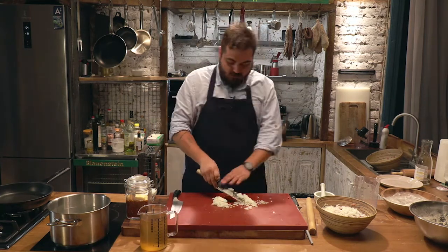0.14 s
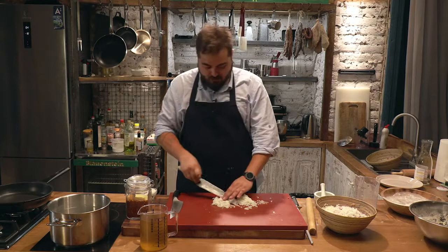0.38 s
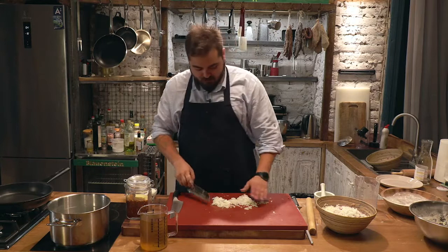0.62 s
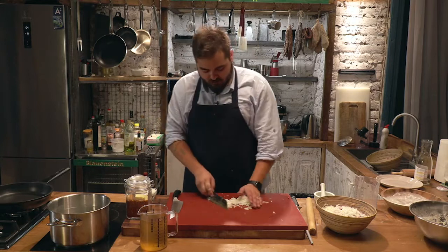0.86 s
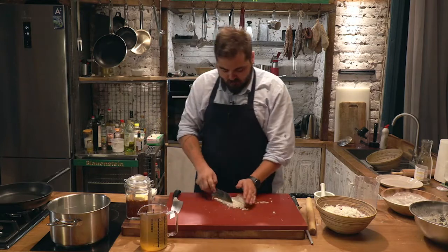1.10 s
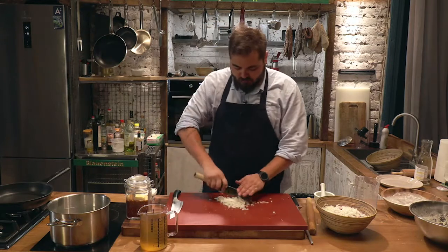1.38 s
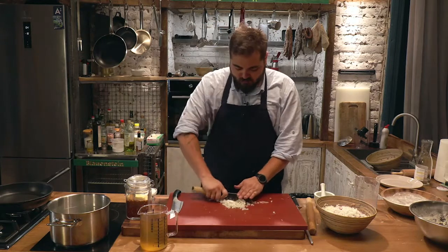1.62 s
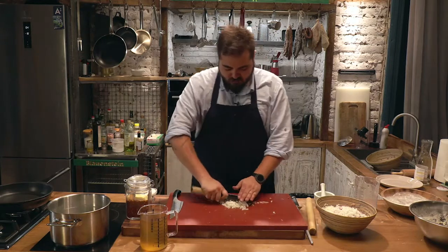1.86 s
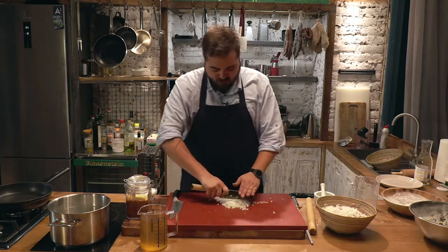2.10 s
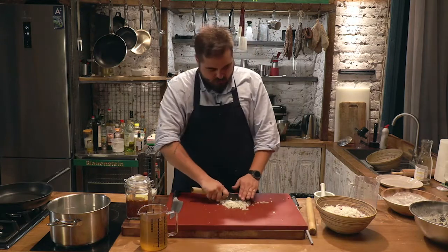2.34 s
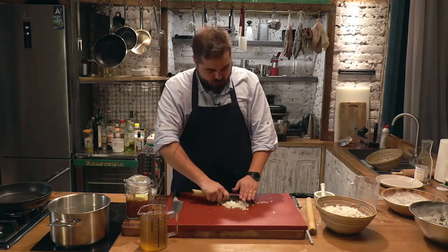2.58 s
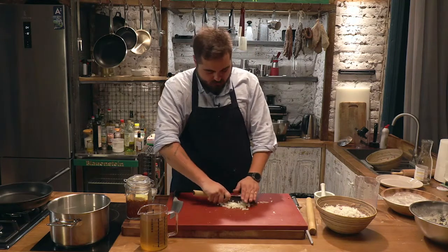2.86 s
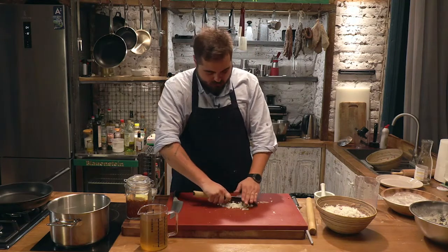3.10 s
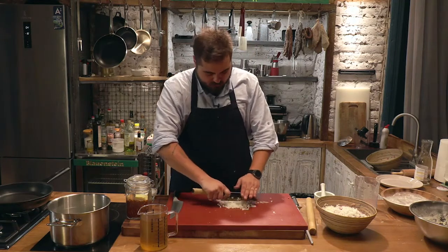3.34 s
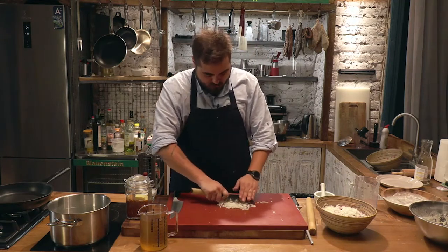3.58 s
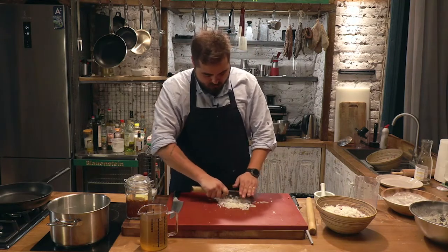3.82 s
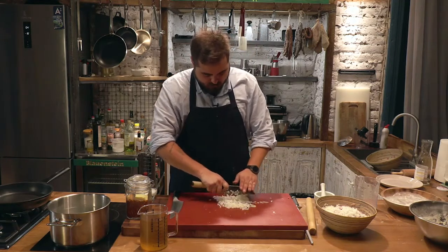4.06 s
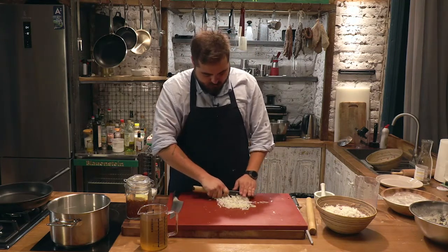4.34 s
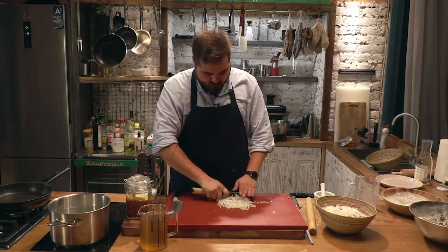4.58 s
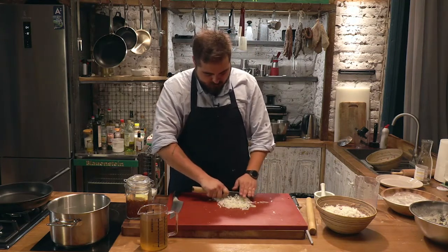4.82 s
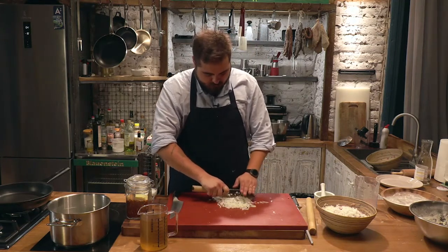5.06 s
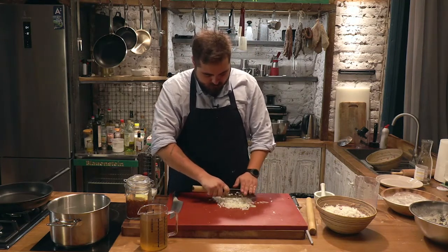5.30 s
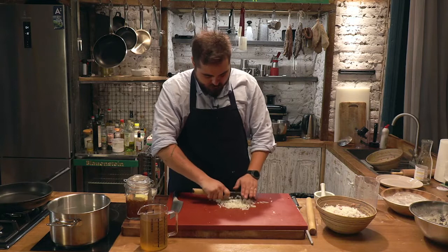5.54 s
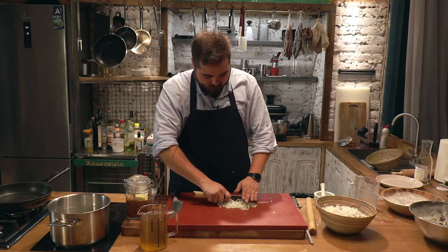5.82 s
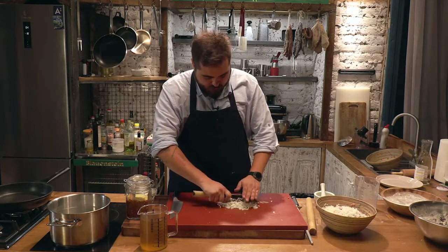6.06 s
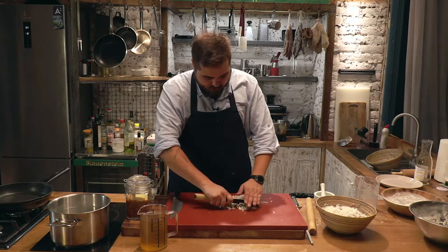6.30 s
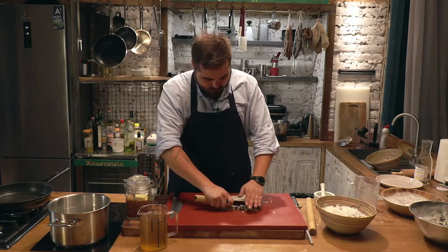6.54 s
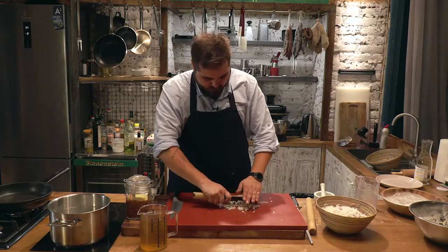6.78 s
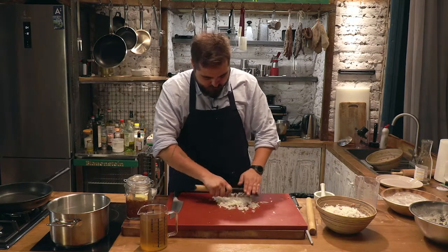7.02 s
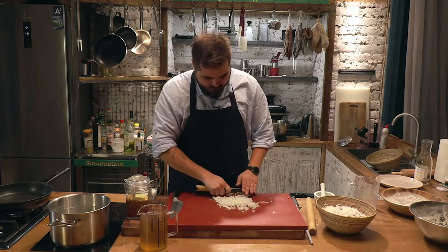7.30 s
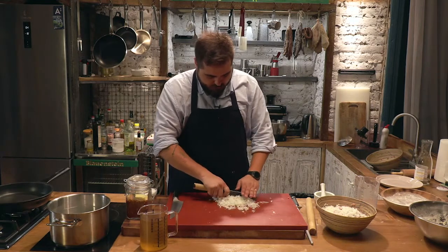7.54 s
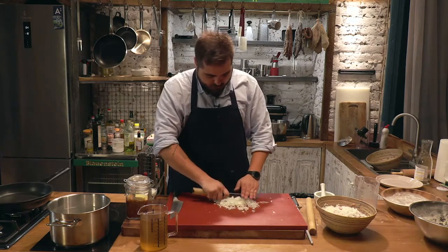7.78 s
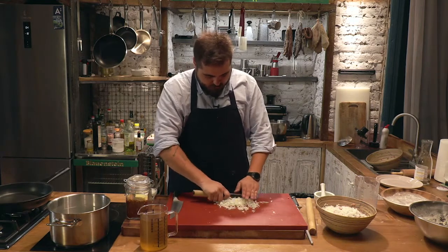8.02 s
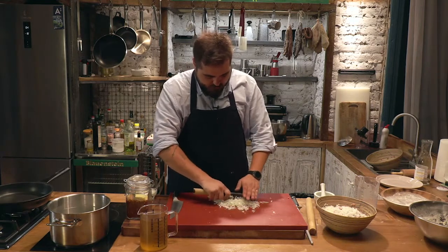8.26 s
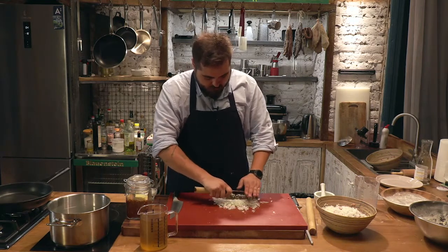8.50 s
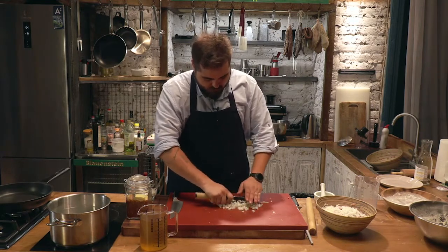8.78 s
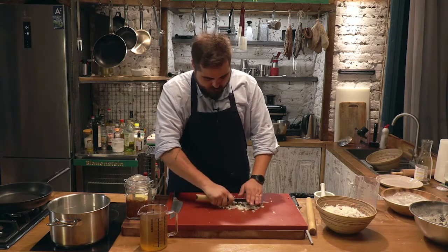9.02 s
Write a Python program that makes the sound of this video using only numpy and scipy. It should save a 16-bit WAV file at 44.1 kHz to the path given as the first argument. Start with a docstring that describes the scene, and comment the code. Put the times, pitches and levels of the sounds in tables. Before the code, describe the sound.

After brief bumps and a scrape, steady chopping knocks, about five a second, crunch wetly through onion on a heavy board in a small room.

```python
"""A knife rocks through minced onion on a thick board in a kitchen: each knock sets the board ringing.
Before most knocks the onion crunches as a patter of random clicks; at the knock, bits squash in a noise burst.
The wet blade ticks as it lifts, and clicks through blade resonances make its scrapes and short grazes.
Behind are dull thuds, shuffling and rustling noise, low rumbles, room air, and echoes of fading noise."""
import sys
import numpy as np
from scipy import signal
from scipy.fft import rfft, irfft
from scipy.io import wavfile

SR = 44100
rng = np.random.default_rng(int(sys.argv[2]) if len(sys.argv) > 2 else 0)


def attenuation_scalar(level_db):
    """Turn a level in dB into a linear amplitude multiplier (20 dB per decade)."""
    decades = np.asarray(level_db, float) / 20
    return 10 ** decades


def file_out(sig):
    """Save sig as 16-bit WAV at sys.argv[1]."""
    # one column per channel
    cols = np.atleast_2d(sig).T
    # limit, then scale
    lim = np.clip(cols, -1, 1)
    pcm = np.round(lim * 32767).astype(np.int16)
    wavfile.write(sys.argv[1], SR, pcm)


N = 402633   # length in samples


def rms_one(x):
    """Scales x to an rms of 1."""
    return x / np.sqrt(np.mean(x ** 2) + 1e-20)


def in_time(rows, outside=None):
    """Draws straight lines between the rows of a table whose first column is t/s."""
    s, *columns = np.transpose(rows)
    t = np.arange(N) / SR
    return [np.interp(t, s, column, outside, outside) for column in columns]


def at_hz(points, hz, column=1):
    """Reads a table at any frequency, with even steps per octave."""
    points = np.array(points)
    return np.interp(np.log(hz), np.log(points[:, 0]), points[:, column])


def coloured(x, spectrum):
    """Shapes x by a spectrum, with 12 dB per octave more loss below its first point; rms 1."""
    hz = np.maximum(np.arange(N // 2 + 1) * SR / N, 1)
    skirt = np.minimum(hz / spectrum[0][0], 1) ** 2
    return rms_one(irfft(rfft(x) * attenuation_scalar(at_hz(spectrum, hz)) * skirt, N))


def drift(rate_hz):
    """Smoothed noise that wanders up and down with an rms of 1."""
    r = np.exp(-2 * np.pi * rate_hz / SR)
    wander = signal.lfilter([1], [1, -2 * r, r * r], rng.standard_normal(N + SR))
    return rms_one(wander[SR:])   # the first second lets the filter settle


def grains(per_s, spread_db):
    """Random clicks of uneven size and sign."""
    sizes = attenuation_scalar(spread_db * np.minimum(rng.exponential(1, N), 5))
    signs = rng.choice([-1, 1], N)
    return sizes * signs * (rng.random(N) < per_s / SR)


def clicks_at(times, db):
    """One click per listed time, silence between."""
    clicks = np.zeros(N)
    clicks[np.round(np.asarray(times) * SR).astype(int)] = attenuation_scalar(db)
    return clicks


def fading(clicks, fade_s):
    """Each click starts a level that dies away."""
    return signal.lfilter([1], [1, -np.exp(-1 / (fade_s * SR))], clicks + 1e-18)


def ring(clicks, hz, t60):
    """A unit click starts a sine of height 1 that loses 60 dB in t60 seconds."""
    r, w = attenuation_scalar(-60 / (t60 * SR)), 2 * np.pi * hz / SR
    return signal.lfilter([0, np.sin(w)], [1, -2 * r * np.cos(w), r * r], clicks + 1e-18)


def strike(times, db, modes, uneven_db, alternate=False):
    """Every blow sets all modes ringing, each with a strength of its own; db may differ by mode."""
    uneven = uneven_db * rng.standard_normal((len(times), len(modes))).T
    strengths = db + np.array(modes)[:, 1:2] + uneven
    out = np.zeros(N)
    for k, ((hz, _, t60), mode_db) in enumerate(zip(modes, strengths)):
        sign = (-1) ** (k * alternate)
        out += sign * ring(clicks_at(times, mode_db), hz, t60)
    return out


# sound of the room air: f/Hz, relative level per Hz/dB
AIR = [(12, -32), (20, 8), (234, 4), (357, -5.5), (780, -10), (1150, -7), (1370, -10), (2020, -14.5),
       (4000, -18), (8410, -22), (14300, -30), (16000, -23.5)]


def room_air():
    """Steady air noise over a low rumble of wandering level."""
    air, deep = rng.standard_normal((2, N))
    rumble = rms_one(signal.sosfilt(signal.butter(2, [20, 60], "band", fs=SR, output="sos"), deep))
    rumble_db = -81 + 1.4 * drift(9)
    return attenuation_scalar(-69) * coloured(air, AIR) + attenuation_scalar(rumble_db) * rumble


# hands and pile moving on the counter: t/s, middling level/dB
STIR = [(0.0, -54.5), (0.07, -68), (0.3, -70.5), (0.99, -74.5), (1.14, -63), (1.35, -65.5), (1.52, -69),
        (1.68, -66.5), (1.82, -92), (2.0, -84), (4.2, -70), (4.42, -73), (4.52, -64.5), (4.6, -60),
        (4.7, -69.5), (6.9, -84), (7.05, -71), (7.3, -70.5), (9.13, -72)]
# sound of the low shuffling: f/Hz, relative level per Hz/dB
SHUFFLE = [(59, -1), (100, -18), (238, -20), (355, 0), (529, -11), (776, -7.5), (934, -18), (1000, -16.5),
           (3000, -35), (3900, -33), (6600, -120)]


def shuffling(rumble_db=-31.5, rise_s=0.03, fall_s=0.089):
    """Low noise as hands and pile move; a low rumble around 350 Hz swells and dies after each knock."""
    shuffle_db, = in_time(STIR)
    s, low_db = np.transpose(KNOCKS)[:2]
    t = np.arange(SR // 2) / SR
    swell = (1 - np.exp(-t / rise_s)) * np.exp(-t / fall_s)
    rumbling = signal.fftconvolve(clicks_at(s, low_db + rumble_db), swell)[:N]
    uneven = attenuation_scalar(2.3 * drift(6.2))
    return (attenuation_scalar(shuffle_db) + rumbling) * uneven * coloured(rng.standard_normal(N), SHUFFLE)


# rustle, up while the pile is pushed together: t/s, middling level/dB
RUSTLING = [(0.0, -76), (0.2, -84), (0.4, -78), (1.04, -78), (1.15, -65.5), (1.27, -70), (1.55, -68),
            (1.68, -76.5), (1.74, -94), (1.9, -78)]
# sound of the rustle: f/Hz, relative level per Hz/dB
RUSTLE = [(1180, -35), (2000, -25), (4050, -2), (8000, -2), (11500, 1), (14300, 3), (16000, -2.5)]


def rustling():
    """Bright noise whose level swings slowly and flickers quickly."""
    level_db, = in_time(RUSTLING)
    flicker_db, swing_db = 1.1 * drift(38), 3.5 * drift(3)
    return attenuation_scalar(level_db + flicker_db + swing_db) * coloured(rng.standard_normal(N), RUSTLE)


# how the kitchen echoes: f/Hz, t60/s, relative level/dB
KITCHEN = [(66, 0.49, -21.5), (163.5, 0.37, -2), (490, 0.33, -16.5), (850, 0.33, -8), (1500, 0.33, -10.5),
           (2900, 0.31, -14.5), (6900, 0.23, -11.5), (14000, 0.49, -19.5)]


def kitchen(x, gap_s=0.002, rise_s=0.012):
    """Echoes thicken within some milliseconds, then each half-octave band dies at its own pace."""
    t = np.arange(SR * 3 // 4) / SR
    edges = 30 * 2 ** np.arange(0, 9.3, .5)
    white, tail = rng.standard_normal((2, len(t))), 0
    for k, (low, high) in enumerate(zip(edges, edges[1:])):
        band_filter = signal.butter(2, [low, high], "band", fs=SR, output="sos")
        band = signal.sosfilt(band_filter, white[k % 2])
        hz = np.sqrt(low * high)
        t60 = at_hz(KITCHEN, hz)
        fade = attenuation_scalar(at_hz(KITCHEN, hz, column=2) - 60 * t / t60)
        tail = tail + band * fade / np.sqrt(t60 * SR / 14)   # a longer tail adds no energy
    tail = tail * np.clip((t - gap_s) / rise_s, 0, 1)
    return signal.fftconvolve(x, tail)[:N]


# dull thuds nearby: t/s, thud level/dB, rattle level/dB
THUDS = [(0.0, -55, -76), (0.036, -48, -54.5), (0.161, -40, -79), (0.174, -45.5, -78), (0.184, -41.5, -76),
         (0.24, -73, -86), (0.256, -65, -63.5), (0.373, -74, -66.5)]
# ringing of the hollow thing: f/Hz, relative level/dB, t60/s
THUD_MODES = [(195, -3.5, 0.057), (251, 1, 0.037), (323, -10, 0.055), (416, -10.5, 0.048),
              (1133, -15, 0.033)]
# sound of its rattle: f/Hz, relative level per Hz/dB
RATTLE = [(400, -3), (700, 4), (1250, 1.5), (1800, -10), (3000, -21), (5000, -32)]


def thuds():
    """Something hollow is bumped: a few modes ring and a noise burst rattles for a moment."""
    s, db, rattle_db = np.transpose(THUDS)
    rattle_level = fading(clicks_at(s, rattle_db), fade_s=0.035)
    rattle = rattle_level * coloured(rng.standard_normal(N), RATTLE)
    return strike(s, db, THUD_MODES, uneven_db=1.5, alternate=True) + rattle


# wet blade leaving the onion: t/s, level/dB, extra level of the modes above 10 kHz/dB
TICKS = [(0.374, -54, 2), (0.4264, -45, -4), (0.4356, -49, -19), (0.542, -52, -5), (0.5826, -48.5, -2),
         (0.6414, -58, -11), (1.2166, -57, -2), (1.726, -61.5, -1), (2.0486, -58, -5), (2.2933, -56, -4),
         (2.361, -57, 1), (2.4548, -62, -3), (2.6274, -54, 4), (2.8888, -58, 7), (3.1472, -53.5, 5),
         (3.3367, -52.5, -6), (3.535, -54, -7), (3.735, -56, -6), (3.966, -58, -9), (4.4052, -52.5, -7),
         (4.8607, -55.5, -6), (5.0777, -55.5, 0), (5.293, -51.5, -2), (5.494, -63, -10), (5.703, -56.5, -1),
         (5.8945, -58, -27), (6.105, -54, -3), (6.3658, -51, -10), (6.5933, -60, -18), (6.8203, -51, -15),
         (8.1367, -51, -11), (8.337, -53, -23), (8.536, -48.5, -11), (8.7374, -52, -14), (8.9398, -51, -8)]
# ringing of a tick: f/Hz, relative level/dB, t60/s
TICK_MODES = [(6340, 1.5, 0.0061), (8760, -13, 0.022), (12240, 6, 0.0017), (14650, -1.5, 0.0093)]


def ticks():
    """Tiny bright rings; the upper modes follow their own strength."""
    s, db, top_db = np.transpose(TICKS)
    upper = np.array(TICK_MODES)[:, :1] > 10000
    tick = strike(s, db + upper * top_db, TICK_MODES, uneven_db=1.5, alternate=True)
    # too small to sound low
    return signal.sosfilt(signal.butter(3, 4000, "high", fs=SR, output="sos"), tick)


# resonances of the blade: f/Hz, width/Hz, relative level/dB
BLADE = [(458, 16, 3), (566, 40, -1.5), (926, 59, -3.5), (1435, 68, -7), (1800, 60, -17), (2270, 190, -6),
         (2680, 75, -8.5), (3660, 220, -9.5), (4190, 100, -13.5), (4710, 150, -7.5), (5610, 170, -15),
         (6100, 120, -12.5), (7820, 190, -20), (9370, 280, -15.5), (10960, 160, -20), (12000, 340, -10),
         (14500, 330, -23), (15100, 440, -14)]
# broad rasp of the blade: f/Hz, relative level per Hz/dB
RASP = [(180, -5), (300, -22), (915, -16), (1010, 1.5), (1140, -31), (1610, -0.5), (4090, -3.5),
        (8220, -28.5), (16000, -19)]


def blade_bands():
    """Dense stick-slip clicks drive the blade resonances, grouped low to top, over a broad rasp."""
    slips = rms_one(grains(4000, spread_db=1.5)) * attenuation_scalar(0.99 * drift(70))
    bands = np.zeros((4, N))
    for k, (hz, width_hz, db) in enumerate(BLADE):
        r = np.exp(-np.pi * width_hz / SR)
        feedback = [1, -2 * r * np.cos(2 * np.pi * hz / SR), r * r]
        mode = signal.lfilter([1 - r * r, 0, r * r - 1], feedback, slips)
        group = np.searchsorted([1000, 3400, 8500], hz)
        bands[group] += (-1) ** k * attenuation_scalar(db + 4 * drift(15)) * mode
    low, middle, high, top = map(rms_one, bands)
    return low, middle, high + attenuation_scalar(-4) * coloured(slips, RASP), top


# long drags over the board, one list each: t/s, level/dB, lower resonances against it/dB
SCRAPES = [
    [(0.71, -70, -3), (0.718, -72, 15), (0.79, -63, -6.5), (0.822, -55.5, -6), (0.857, -66, -10),
     (0.872, -61.5, -6), (0.9, -60, -13), (0.92, -56.5, -4), (0.96, -57.5, -5.5), (0.985, -73, -2),
     (1.0, -88, -4)],
    [(7.3, -79, -3), (7.318, -66, -6), (7.342, -55, 4.5), (7.39, -53, 1.5), (7.434, -51, -10),
     (7.446, -79, -10), (7.5, -89, -4)],
]
# short grazes of the blade: start t/s, length/s, level at the end of that length/dB
GRAZES = [(1.485, .052, -62.5), (1.843, 0.053, -65), (2.514, .03, -60.5), (4.349, .025, -67),
          (4.526, 0.057, -71.5), (5.167, 0.027, -58.5), (7.589, 0.037, -71)]


def graze_rows(s, length, db, edge_s=0.007, span_db=20, swell_db=0.5, lower_db=-8):
    """Pressure builds during a graze, then lets go; rows as for a long scrape."""
    return [(s - edge_s, db - span_db, lower_db),
            (s, db - swell_db, lower_db),
            (s + length, db, lower_db),
            (s + length + edge_s, db - span_db, lower_db)]


def scrapes(squeak_db=1.5, top_db=-5, top_follows=0.37, graze_top_db=4.5):
    """Pressure and angle shift the balance of the blade's resonances during each scrape or graze."""
    low, middle, high, top = blade_bands()
    lower = middle + attenuation_scalar(squeak_db) * low
    strokes = [(rows, 0) for rows in SCRAPES]
    strokes += [(graze_rows(*graze), graze_top_db) for graze in GRAZES]   # a light touch is brighter
    out = 0
    for rows, brighter_db in strokes:
        stroke_db, lower_db = in_time(rows, outside=-200)
        stroke_top_db = top_db + top_follows * (stroke_db + 55) + brighter_db   # louder is brighter
        out = out + attenuation_scalar(stroke_db) * (high + attenuation_scalar(lower_db) * lower + attenuation_scalar(stroke_top_db) * top)
    return out


# edge entering the onion: start t/s, level/dB
CUTS = [(1.833, -58), (2.173, -62.5), (2.464, -70), (2.488, -66), (2.746, -56), (2.999, -59), (3.185, -55),
        (3.388, -58.5), (3.571, -60.5), (3.83, -56), (4.244, -64), (4.526, -63), (4.716, -60),
        (4.918, -63.5), (5.131, -59), (5.352, -60), (5.548, -63.5), (5.751, -60.5), (5.936, -61.5),
        (6.226, -51), (6.459, -67), (6.662, -55), (6.842, -57.5), (7.778, -58), (7.973, -57), (8.17, -64),
        (8.364, -65.5), (8.573, -61), (8.77, -60.5), (8.965, -59)]
# sound of the crunch: f/Hz, relative level per Hz/dB
CRUNCH = [(880, -29), (1500, -2), (5440, -1.5), (7840, -5), (8740, -3.5), (9750, -2), (12400, 0),
          (14800, 0.5), (16000, -1)]


def crunch(rise_s=0.014, fall_s=0.0039, after_db=-9.5, after_s=0.022, longest_s=0.072, overrun_s=0.00067):
    """Cells burst as the edge passes through the onion, stop short at the board and squelch faintly."""
    t, level = np.arange(N) / SR, np.zeros(N)
    lands = np.array(KNOCKS)[:, 0]
    for s, db in CUTS:
        next_knock = lands[lands > s][0]
        length = min(next_knock - s + overrun_s, longest_s)
        near = slice(round(s * SR), round((s + .3) * SR))
        since = t[near] - s
        late = np.maximum(since - length, 0)
        ending = np.exp(-late / fall_s) + attenuation_scalar(after_db) * np.exp(-late / after_s)
        level[near] += attenuation_scalar(db) * np.clip(since / rise_s, 0, 1) * ending
    bursts = rms_one(grains(7000, spread_db=2)) * attenuation_scalar(3 * drift(110))
    return level * coloured(bursts, CRUNCH)


# sound of squashed onion: f/Hz, relative level per Hz/dB
SPLAT = [(600, -25), (1200, 9.5), (2500, 6.5), (4000, -6), (6000, -24), (9000, -43), (16000, -37)]


def squash(splat_db=-14.5, fade_s=0.0032):
    """Bits of onion squash under the edge: a very short noise burst at each knock."""
    s, _, _, upper_db, _ = np.transpose(KNOCKS)
    level = fading(clicks_at(s, upper_db + splat_db), fade_s)
    return level * coloured(rng.standard_normal(N), SPLAT)


# ringing of the counter: f/Hz, relative level/dB, t60/s
COUNTER = [(29.1, -0.5, 0.18), (77, -3, 0.16), (122.6, -2.5, 0.074), (172.4, 6.5, 0.034), (254, -17, 0.39)]
# share of the knock's swing that the thump follows: lowest modes, middle modes [no unit]
THUMP_FOLLOWS = [0.61, 0.22]


def counter_thump(middling_db=-53.5):
    """The counter thumps softly under each knock, as a few low modes."""
    s, low_db, middle_db, _, _ = np.transpose(KNOCKS)
    swing = [low_db - low_db.mean(), middle_db - middle_db.mean()]
    thump = strike(s, middling_db + np.dot(THUMP_FOLLOWS, swing), COUNTER, uneven_db=5.5)
    return signal.sosfilt(signal.butter(2, 263, fs=SR, output="sos"), thump)


# edge landing on the board: t/s, level of lowest, middle and upper modes/dB (three columns),
# f/Hz favoured by the spot struck
KNOCKS = [(0.7181, -34, -60, -51, 1390), (0.7333, -50, -65, -60, 1390), (1.4144, -29.5, -50, -43, 1100),
          (1.8556, -25.5, -46, -37, 1250), (1.893, -41, -50, -48, 1260), (2.1931, -30, -36, -21, 1900),
          (2.5084, -16.5, -26, -26, 1340), (2.7871, -19.5, -39, -41.5, 1360),
          (3.0331, -21, -28.5, -32.5, 1500), (3.1949, -26.5, -25, -21, 1500),
          (3.407, -26, -25.5, -21, 1500), (3.6044, -29, -28, -18, 1850), (3.8651, -19.5, -29, -28.5, 1850),
          (4.2726, -31.5, -30.5, -26, 1500), (4.732, -35.5, -36, -26.5, 1500),
          (4.9442, -34.5, -28.5, -31, 1320), (5.1741, -20, -29.5, -28.5, 1850),
          (5.3903, -24, -25.5, -27, 1850), (5.5846, -24.5, -27.5, -30.5, 1230),
          (5.78, -18, -32.5, -33.5, 1320), (5.968, -17.5, -33.5, -32.5, 1360),
          (6.239, -14.5, -27.5, -25, 1080), (6.473, -19, -20, -20.5, 1130),
          (6.6743, -14.5, -26.5, -26.5, 1300), (6.8601, -20, -41.5, -37, 1420),
          (7.2564, -32.5, -45, -45.5, 1600), (7.57, -31, -40.5, -31.5, 1800),
          (7.7957, -30.5, -29.5, -27.5, 1850), (7.9981, -19.5, -30, -28.5, 1850),
          (8.2142, -38, -75, -69, 1500), (8.402, -20, -27.5, -31.5, 1280), (8.6099, -23, -30, -35.5, 1310),
          (8.8085, -31.5, -60, -63.5, 1150), (8.9961, -19.5, -30, -32, 1330)]
# ringing of the board: f/Hz, relative level/dB, t60/s
BOARD = [(303.8, -15.5, 0.14), (423, -26, 0.21), (494, -26.5, 0.16), (632, -1, 0.026), (670, -12, 0.029),
         (793, -4, 0.041), (874, -12, 0.062), (1024, -4, 0.019), (1278, -6.5, 0.026), (1455, 4.5, 0.0083),
         (1850, -1.9, 0.0097), (2480, -46, 0.016), (2770, -6, 0.0036)]


def board_knocks(middle_from_hz=660, upper_from_hz=1140, spot_db=70, contact_hz=2060, radiate_hz=411):
    """The edge lands and the board's modes ring; the spot struck favours some upper modes."""
    s, low_db, middle_db, upper_db, spot_hz = np.transpose(KNOCKS)
    hz = np.array(BOARD)[:, :1]
    octaves_off = np.log2(hz / spot_hz)
    spot_upper_db = upper_db - spot_db * np.minimum(octaves_off, .4) ** 2
    db = np.where(hz < upper_from_hz, middle_db, spot_upper_db)
    db = np.where(hz < middle_from_hz, low_db, db)
    board = strike(s, db, BOARD, uneven_db=2.5)
    # plastic gives: a soft contact
    board = signal.sosfilt(signal.bessel(5, contact_hz, fs=SR, norm="mag", output="sos"), board)
    # a small plate radiates little bass
    return signal.sosfilt(signal.butter(3, radiate_hz, "high", fs=SR, output="sos"), board)


def scene():
    """Adds the sounds of the work, their echoes and the background."""
    knocks = squash() - board_knocks() - counter_thump()
    work = knocks + crunch() + scrapes() + thuds()
    tick = ticks()
    echoes = attenuation_scalar(6) * kitchen(work + attenuation_scalar(-4.5) * tick)
    background = room_air() + shuffling() + rustling()
    return (work + tick + echoes + background)[None]


def roll_off(x):
    """The treble ends steeply here."""
    return signal.sosfilt(signal.butter(12, 16510, fs=SR, output="sos"), x)


def record(dry):
    """A steep filter cuts the top of the mix, down 50 dB from 16.3 kHz."""
    cut = signal.sosfilt(signal.cheby2(12, 50, 16300, fs=SR, output="sos"), dry)
    return roll_off(cut)


dry = scene()
out = record(dry)
file_out(out)
```